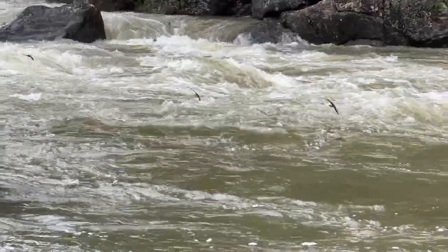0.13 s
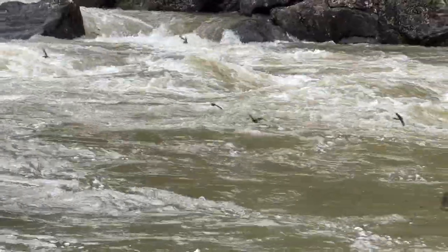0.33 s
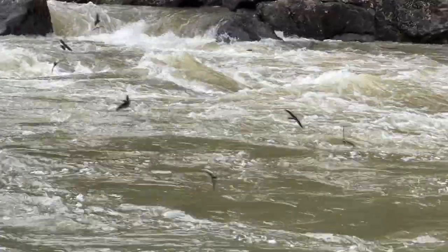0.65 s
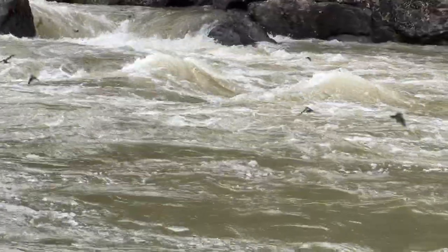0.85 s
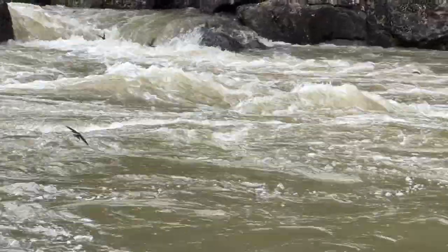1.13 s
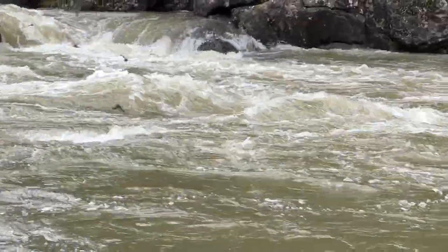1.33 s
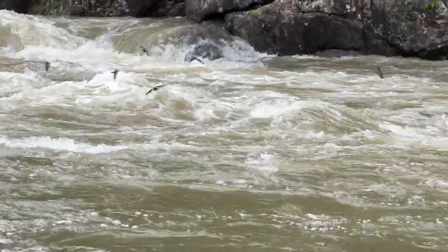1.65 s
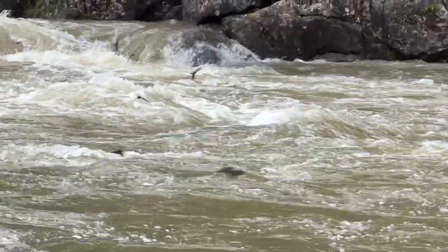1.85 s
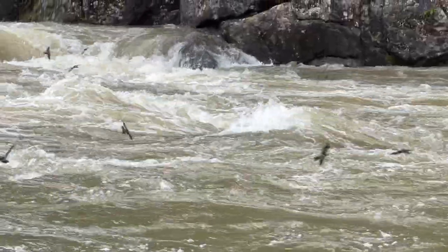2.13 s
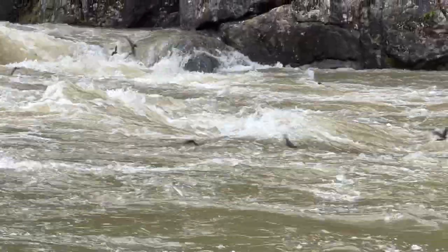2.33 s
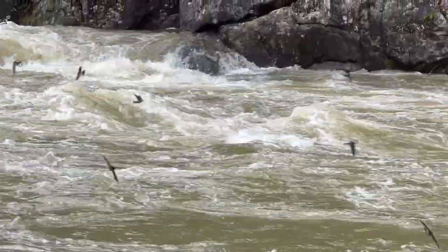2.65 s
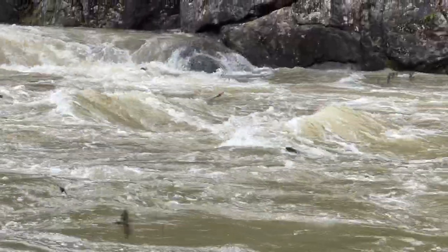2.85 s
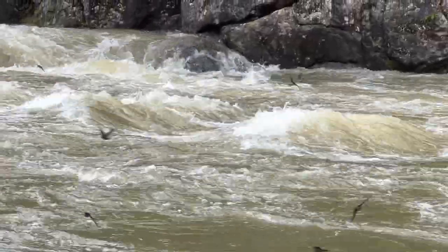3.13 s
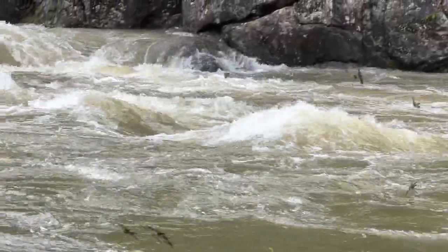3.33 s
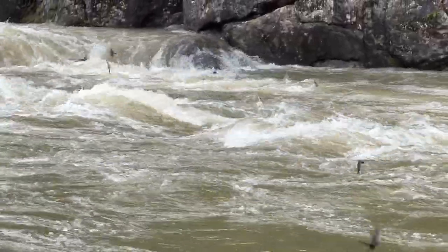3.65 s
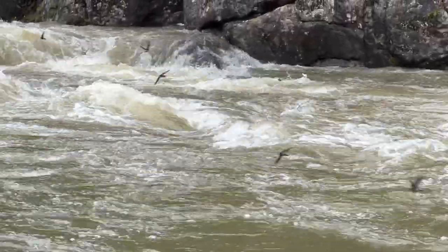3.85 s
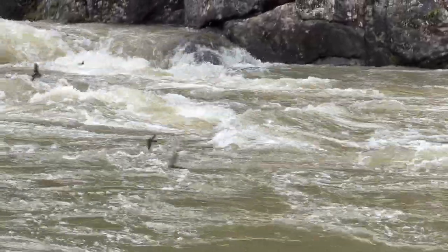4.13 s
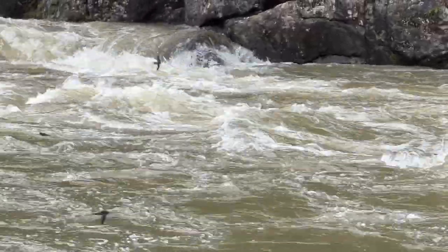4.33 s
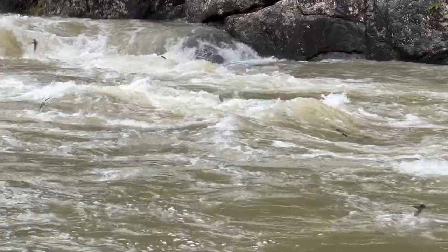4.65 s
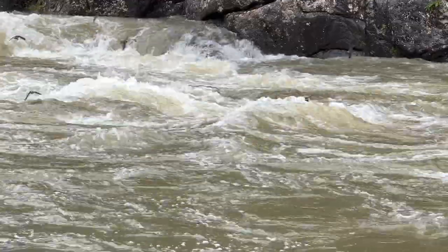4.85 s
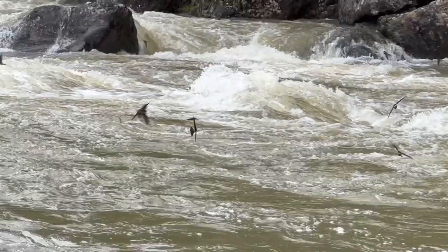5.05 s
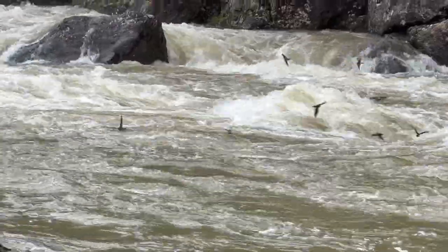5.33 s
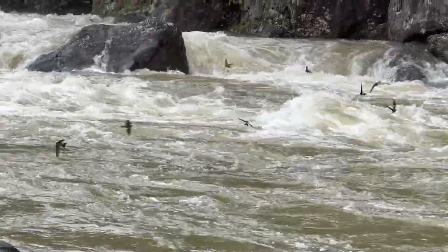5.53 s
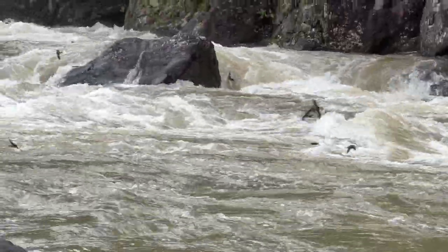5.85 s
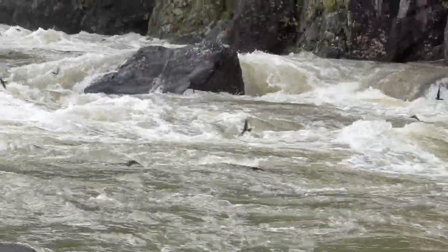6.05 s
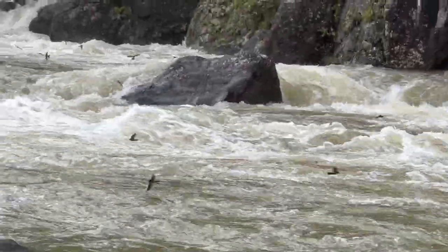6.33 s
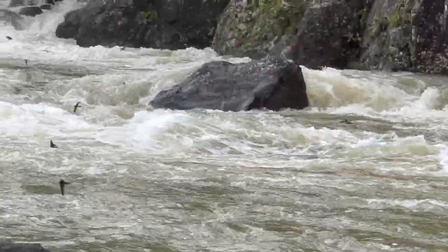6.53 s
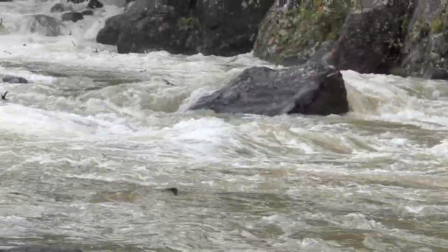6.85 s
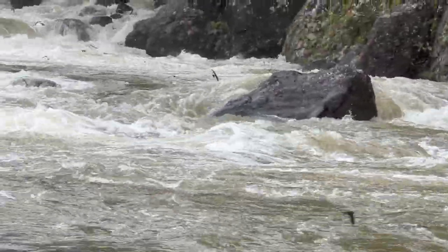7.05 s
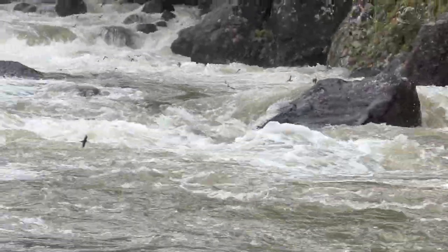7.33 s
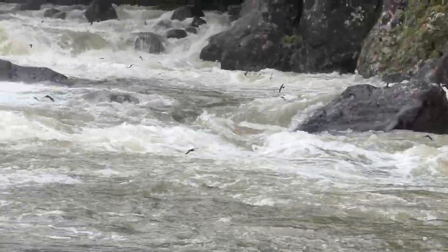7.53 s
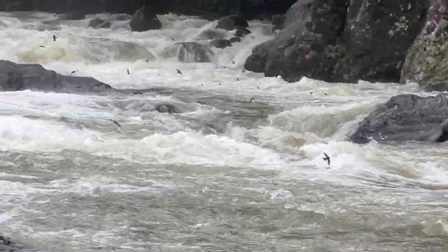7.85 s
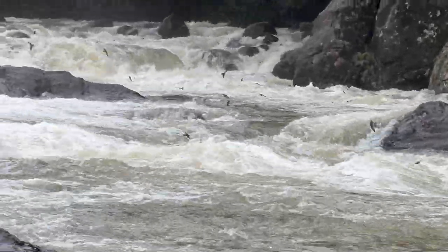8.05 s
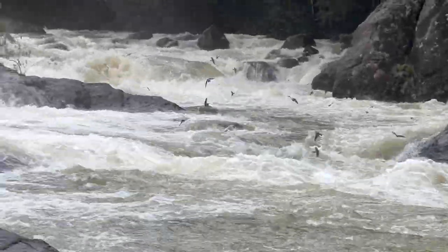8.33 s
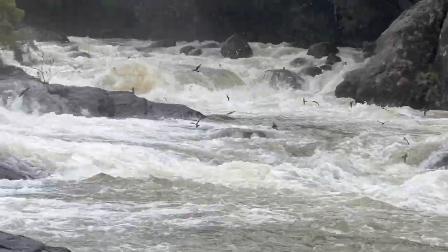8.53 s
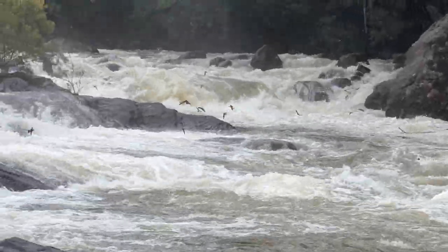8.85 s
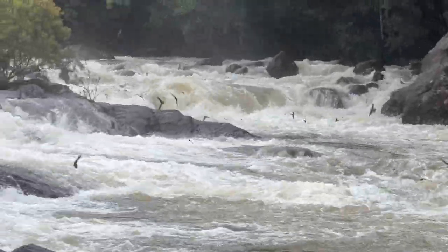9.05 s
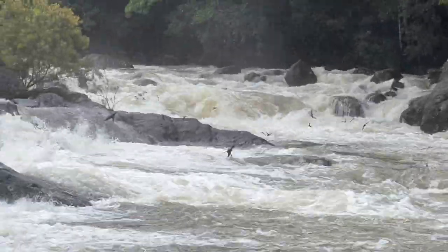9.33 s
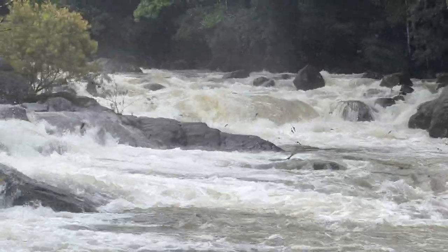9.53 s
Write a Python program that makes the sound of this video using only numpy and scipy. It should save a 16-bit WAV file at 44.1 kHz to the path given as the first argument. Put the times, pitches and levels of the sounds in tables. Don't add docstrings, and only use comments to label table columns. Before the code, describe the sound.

Nearly ten seconds of unbroken white water rushing over river boulders. From 0 s a dense, noisy bed of deep rumble, full mid roar, breaking-wave rush and grainy spray hiss runs at middling strength, starting with a small splashy surge and easing slightly near 1 s. Sharp little drop ticks dot 1 to 1.5 s. At about 2.3 s a low wave heaves, and near 2.45 s a quick cluster of hollow bubbles plops. From 3 to 5 s the flow is stronger, with brighter spray, ticking drops and deep surges around 3.7 and 4.3 s. Just after 5 s it drops suddenly, spray most of all, and stays weaker to the end, with gentle swells near 6.3, 7.9 and 9.1 s and a few faint ticks and plops around 7.2 and 8 s. Close outdoor stereo, centred lows, slightly swimmy treble, highest frequencies dulled.

```python
import sys
import numpy as np
from scipy import signal
from scipy.fft import rfft, irfft, next_fast_len
from scipy.io import wavfile
from scipy.ndimage import uniform_filter1d

SR = 44100
rng = np.random.default_rng(int(sys.argv[2]) if len(sys.argv) > 2 else 0)


def file_out(sig):
    cols = np.atleast_2d(sig).T
    lim = np.clip(cols, -1, 1)
    pcm = np.round(lim * 32767).astype(np.int16)
    wavfile.write(sys.argv[1], SR, pcm)


def linear_from_db(decibels):
    return 10 ** (np.asarray(decibels, float) / 20)


N = 427329


def rms_one(x):
    return x / np.sqrt(np.mean(x ** 2) + 1e-20)


def at_hz(points, hz):
    table = np.array(points, float)
    return [np.interp(np.log(hz + 1), np.log(table[:, 0]), column) for column in table[:, 1:].T]


def drift(rate_hz):
    pole = np.exp(-80 * np.pi * rate_hz / SR)
    noise = rng.standard_normal(N // 40 + 2002)
    slow = signal.lfilter([1], [1, -2 * pole, pole * pole], noise)[2000:]
    return np.interp(np.arange(N) / 40, np.arange(len(slow)), rms_one(slow))


def band(hz, low_hz, high_hz):
    def rise(edge_hz):
        return np.clip(0.5 + 2 * np.log2((hz + 1) / edge_hz), 0, 1)
    return rise(low_hz) - rise(high_hz)


def add_bubble(x, at, hz, peak_db, cycles, climb):
    t = np.arange(int(1.5 * cycles / hz * SR)) / SR
    decay = np.exp(-np.log(1000) * t * hz / cycles)
    shape = decay * (1 - np.exp(-0.6 * t * hz))
    tone = np.sin(2 * np.pi * hz * t * (1 + climb * t * hz / cycles))
    tone = linear_from_db(peak_db) * shape / shape.max() * tone
    start = int(at * SR)
    x[start:start + len(t)] += tone[:max(N - start, 0)]


def gurgle(out):
    for when, pitch, strength in rng.random((400, 3)):
        peak_db = -35 + 10 * strength - 6 * pitch
        add_bubble(out, when * N / SR, 500 * 6 ** pitch, peak_db, cycles=21.5, climb=0.26)


# start in seconds, peak level in dB, pitch in Hz.
FINE_DROPS = [
    (0.165, -32, 13000),
    (0.3107, -30, 12600),
    (1.163, -21, 14600),
    (1.163, -25, 11800),
    (3.6321, -30, 12100),
    (4.4149, -30, 12400),
    (4.7731, -29, 12400),
    (4.8424, -33, 12500),
    (8.0147, -32, 14100),
]


def fine_drops(out):
    for at, peak_db, hz in FINE_DROPS:
        add_bubble(out, at, hz, peak_db + 3, cycles=11, climb=0.05)


# start in seconds, peak level in dB, pitch in Hz.
SPRAY_DROPS = [(0.9806, -19, 7440), (1.2336, -24, 7690), (1.3533, -15, 7100), (1.4735, -21, 6700),
               (3.0385, -20, 6930), (3.3782, -17, 7540), (3.5503, -18, 5940), (4.135, -17, 6970),
               (4.4184, -18, 7170), (6.0771, -29, 6610), (7.1762, -23, 6930), (7.3477, -20, 7480)]


def spray_drops(out):
    for at, peak_db, hz in SPRAY_DROPS:
        add_bubble(out, at, hz, peak_db + 2.0, cycles=37, climb=0.04)


# start in seconds, peak level in dB, pitch in Hz, ringing in cycles.
PLOPS = [
    (2.4405, -20, 1800, 13),
    (2.4658, -11.5, 1150, 12),
    (2.479, -20, 1450, 13),
    (3.5495, -20, 5000, 13),
    (4.262, -19, 2060, 22),
    (4.536, -21, 2080, 20),
    (4.77, -20, 1700, 18),
    (7.1768, -19, 4700, 9),
    (7.9912, -19, 1450, 15),
]


def plops(out):
    for at, peak_db, hz, cycles in PLOPS:
        add_bubble(out, at, hz, peak_db, cycles=cycles, climb=0.1)


def bubbles():
    out = np.zeros(N)
    gurgle(out)
    fine_drops(out)
    spray_drops(out)
    plops(out)
    return out


def turbulence(grain_per_s, grain_db, grain_spread_db):
    size_db = grain_spread_db * np.minimum(rng.exponential(1, (2, N)), 5)
    sizes = linear_from_db(size_db) * rng.choice([-1, 1], (2, N))
    born = rng.random(N) < grain_per_s / SR
    return rng.standard_normal((2, N)), linear_from_db(grain_db) * rms_one(sizes * born)


# time in seconds, level in dB.
COURSE = [(0, 0.5), (.4, 0), (1, -.7), (2, 0.1), (2.7, 1), (3.15, 1.5), (3.6, 2), (4.2, 1.5), (5.03, 1.5),
          (5.05, -0.74), (6.7, -1), (8.4, -1), (9.1, -1), (9.69, -0.5)]
# centre in Hz, level in dB where the course is zero, share of its
CLASSES = [
    (80, -28.5, 0.73),
    (400, -25, .8),
    (2000, -30, .8),
    (7000, -32, 1.32),
]
# crest in seconds, lift in dB, size as a frequency in Hz.
BREAKERS = [(.02, 2.5, 90), (.2, 2.5, 7000), (.48, 1.5, 600), (2.33, 4.5, 80), (2.7, 0.5, 2500),
            (3.52, 2, 3000), (3.7, 3, 80), (4.3, 4, 150), (4.6, 1.5, 250), (4.33, 0.5, 5000),
            (4.95, 1.3, 300), (5.8, -0.7, 400), (6.27, 1, 5000), (6.4, 1.5, 80), (6.95, 1, 400),
            (7.9, 1.7, 300), (8.65, -1.5, 90), (8.66, 1, 1800), (9.15, 1.5, 2000), (9.45, 0.5, 350)]
RISE_S, FALL_S, REACH_OCTAVES = 0.063, 0.097, 1.7


def class_levels():
    t = np.arange(0, N + 64, 64) / SR
    course_db = np.interp(t, *np.transpose(COURSE))
    crest, lift_db, size_hz = np.transpose(BREAKERS)[:, :, None]
    swell = np.exp(-((t - crest) / np.where(t < crest, RISE_S, FALL_S)) ** 2)
    levels = []
    for hz, level_db, share in CLASSES:
        nearness = np.exp(-(np.log2(size_hz / hz) / REACH_OCTAVES) ** 2)
        breakers_db = np.sum(lift_db * swell * nearness, axis=0)
        total_db = level_db + share * course_db + breakers_db
        levels.append(linear_from_db(np.interp(np.arange(N) / SR, t, total_db)))
    return levels


SEAMS_HZ = (160, 1000, 4500)
# frequency in Hz, density in dB per Hz.
WATER = [(25, -48), (45, -7.5), (68, -1), (130, -3), (300, -4), (1000, -10.5), (2100, -18), (4600, -24.5),
         (7000, -19.5), (8100, -23.5), (9200, -32), (10900, -29), (13300, -36), (15800, -35.5)]
RUSH_CUTS_HZ = (1000, 1500, 2200, 3200, 4500)
SPRAY_CUTS_HZ = (4500, 5600, 6800, 8300, 10500, 13000, 30000)


def white_water(hz, surge_db, patch_db):
    size = 2 * (len(hz) - 1)
    noise, grains = turbulence(grain_per_s=1300, grain_db=-9.0, grain_spread_db=5.5)
    colour = linear_from_db(at_hz(WATER, hz)[0])
    smooth, grainy = rfft(noise, size) * colour, rfft(grains, size) * colour

    def filtered(spectrum, low_hz, high_hz):
        return irfft(spectrum * band(hz, low_hz, high_hz), size)[:, :N]

    rumble_level, roar_level, rush_level, spray_level = class_levels()
    rumble = rms_one(filtered(smooth, 5, SEAMS_HZ[0]))
    roar = rms_one(filtered(smooth, SEAMS_HZ[0], SEAMS_HZ[1]))
    surge = 0.33 * drift(22) + 0.41 * drift(29)
    out = rumble_level * rumble + roar_level * roar * linear_from_db(0.73 * drift(7.5))
    for level, cuts_hz in ((rush_level, RUSH_CUTS_HZ), (spray_level, SPRAY_CUTS_HZ)):
        layer = 0
        for low_hz, high_hz in zip(cuts_hz, cuts_hz[1:]):
            near = np.clip(np.log2(low_hz / 700) / 3.8, 0, 1)
            part = filtered(smooth + near * grainy, low_hz, high_hz)
            layer = layer + part * linear_from_db(near * surge_db * surge + patch_db * drift(15))
        out = out + level * rms_one(layer)
    return out


# frequency in Hz, likeness from 0 to 1, lag of the left in radians.
PORTS = [(60, .998, -.07), (260, .94, -.2), (600, .65, -.3), (950, .52, -.3), (1300, .73, .1),
         (1650, .96, .15), (2150, .99, 0), (3400, .93, -.33), (5200, .96, 0), (8050, .93, .4),
         (8600, .75, 1.35), (9550, .91, 2.85), (11500, .74, 4.45), (13600, .94, 6.28), (15800, .66, 8.55)]


def scene():
    size = next_fast_len(N + 4096, True) // 2 * 2
    hz = np.arange(size // 2 + 1) * SR / size
    water = white_water(hz, surge_db=1.45, patch_db=0.84)
    alike, lag = at_hz(PORTS, hz)
    alike = np.clip(alike, 0, 1)
    shared = rfft(water[0] + bubbles(), size) * np.sqrt((1 + alike) / 2)
    opposed = rfft(water[1], size) * np.sqrt((1 - alike) / 2)
    left = (shared + opposed) * np.exp(-0.5j * lag)
    right = (shared - opposed) * np.exp(0.5j * lag)
    return irfft(np.array([left, right]), size)[:, :N]


# frequency in Hz, depth in dB below the other at which mid or side is dropped.
GATE = [(1650, 60), (1700, 15), (2300, 14), (3400, 11), (4500, 10.5), (6200, 9), (8000, 6), (9300, 4.2),
        (10400, 5.5), (16000, 5.5)]
FRAME, FRAME_START, GATE_BINS, TOP_HZ = 2048, 778, 8, 15760


def stereo_gate(dry):
    pad = FRAME - FRAME_START
    pair = np.pad([dry[0] + dry[1], dry[0] - dry[1]], ((0, 0), (pad, FRAME)))
    window = np.sin(np.pi * (np.arange(FRAME) + 0.5) / FRAME)
    shape = dict(window=window, nperseg=FRAME, noverlap=FRAME // 2)
    hz, _, cells = signal.stft(pair, SR, **shape)
    power = np.add.reduceat(np.abs(cells) ** 2, np.arange(0, len(hz), GATE_BINS), axis=1)
    power = uniform_filter1d(power, size=2, axis=2)
    frames = power.shape[2]
    held = np.minimum(np.arange(frames) // 2 * 2 + 1, frames - 1)
    power = power[:, :, held]
    centre = hz[::GATE_BINS, None] + hz[GATE_BINS // 2]
    waver_db = 1.6 * rng.standard_normal(frames)[held] * np.where(centre < 6500, 1, 0.5)
    waver_db = waver_db + 1.5 * rng.standard_normal(power.shape[1:])[:, held] * (centre < 10000)
    margin = linear_from_db(2 * (at_hz(GATE, centre)[0] + waver_db))
    keep = np.repeat(power > power[::-1] / margin, GATE_BINS, axis=1)[:, :len(hz)]
    keep = keep & (hz < TOP_HZ)[:, None]
    mid, side = signal.istft(cells * keep, SR, **shape)[1][:, pad:pad + N] / 2
    return np.array([mid + side, mid - side])


def low_pass(x):
    return signal.sosfilt(signal.butter(12, 15890, fs=SR, output="sos"), x)


def record(dry):
    mix = stereo_gate(dry)
    return low_pass(mix)


dry = scene()
out = record(dry)
file_out(out)
```